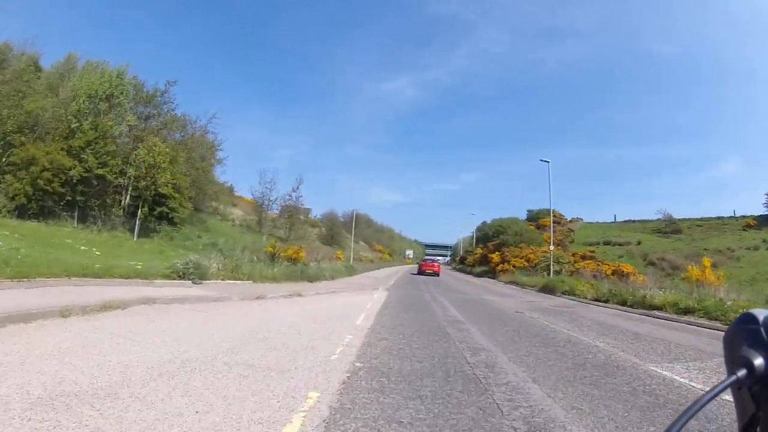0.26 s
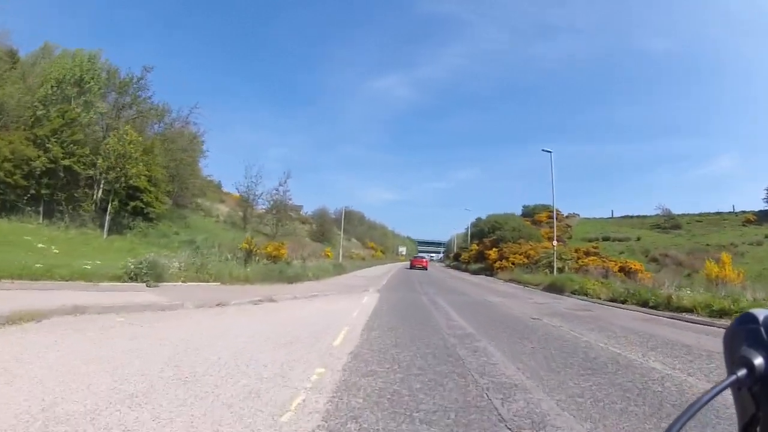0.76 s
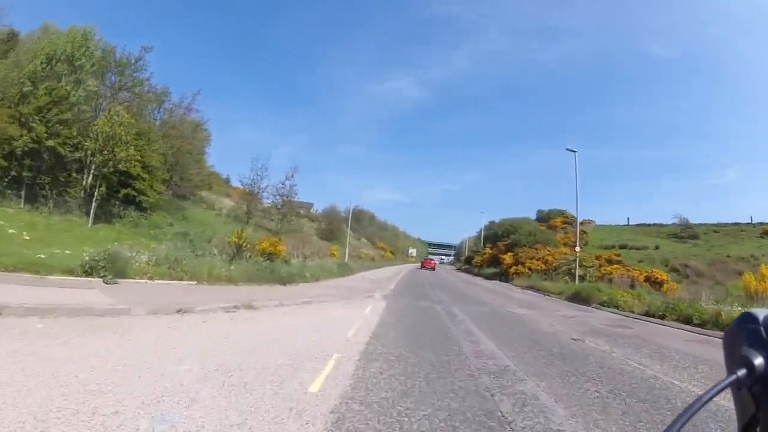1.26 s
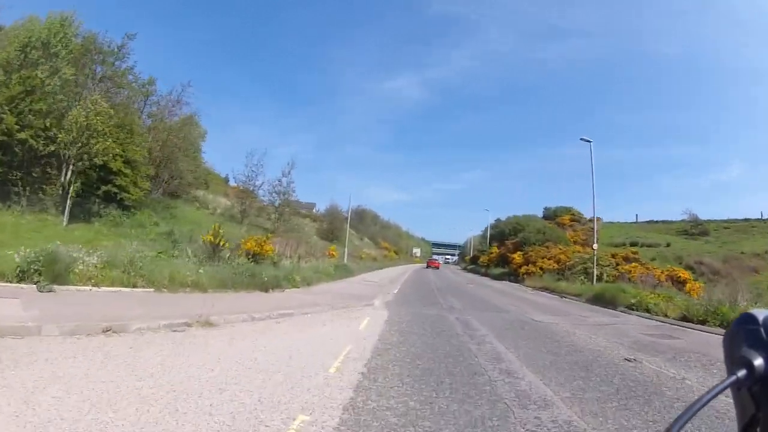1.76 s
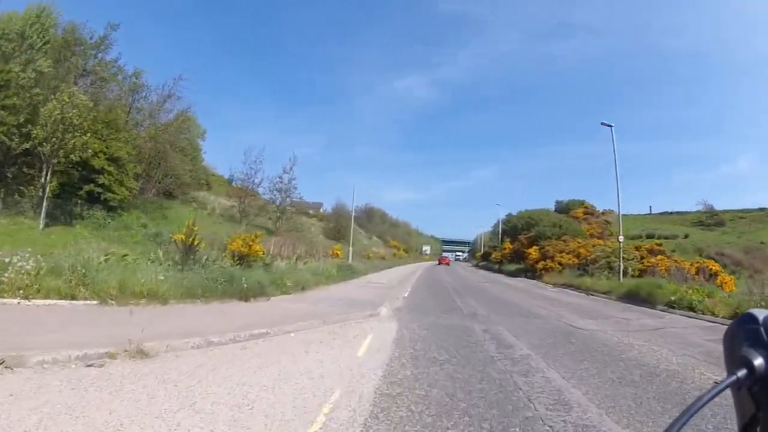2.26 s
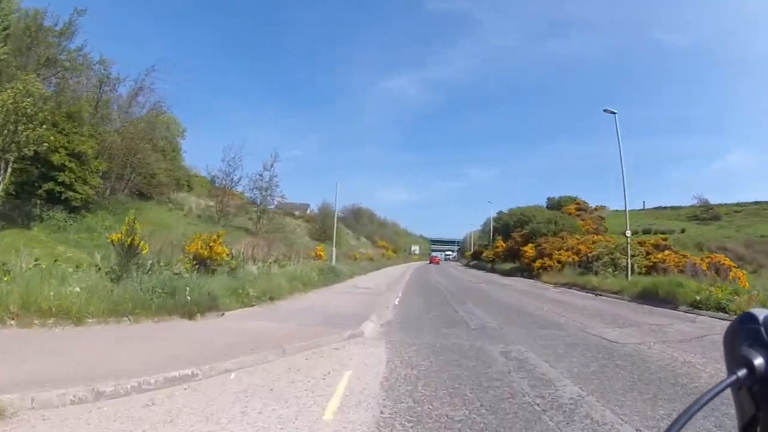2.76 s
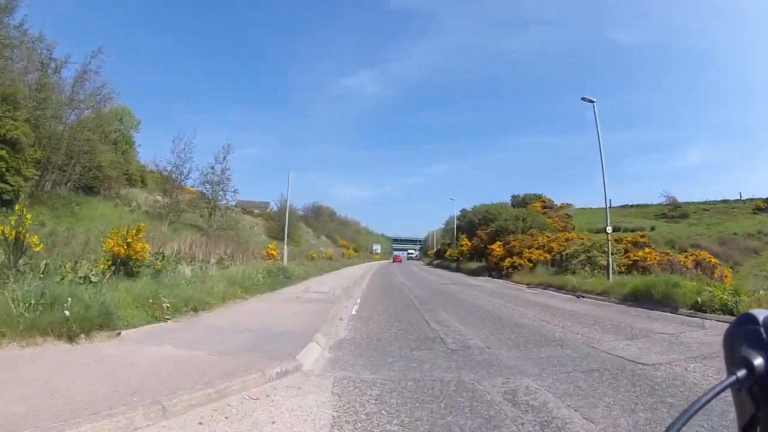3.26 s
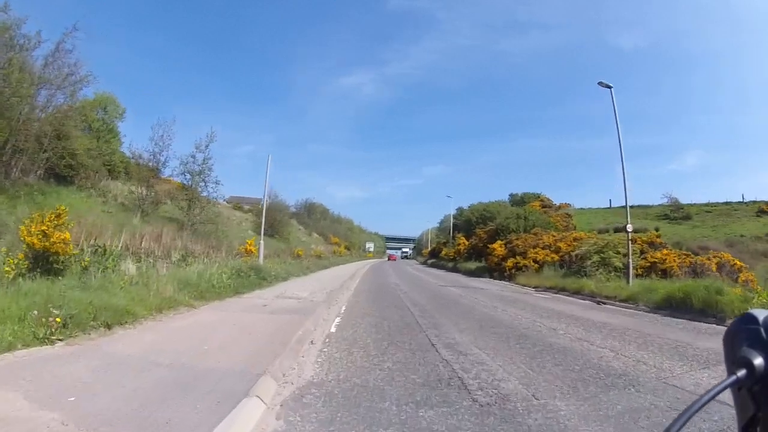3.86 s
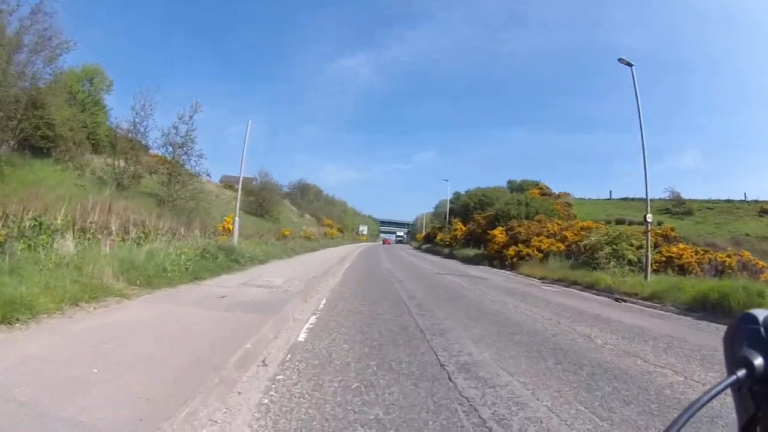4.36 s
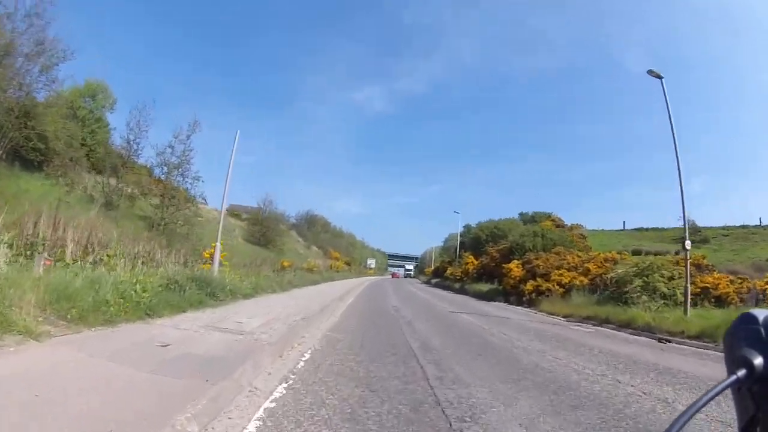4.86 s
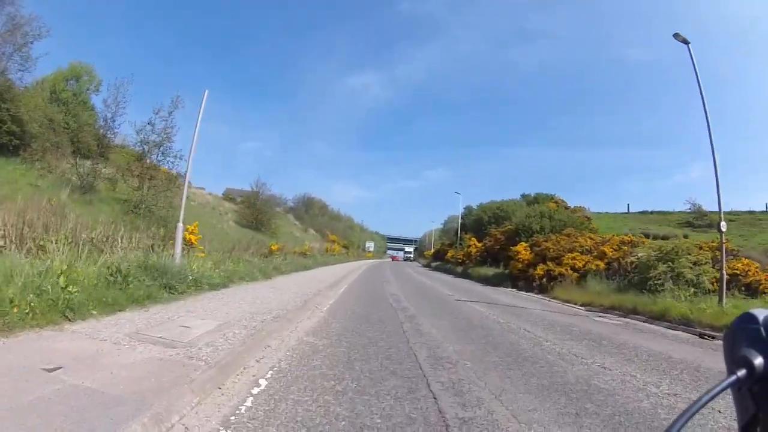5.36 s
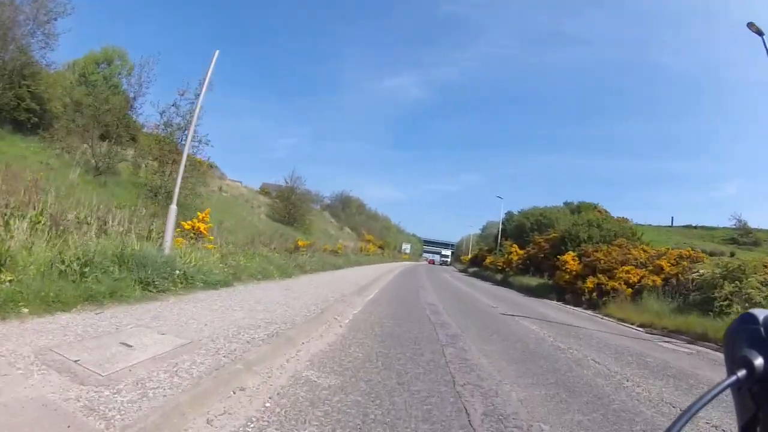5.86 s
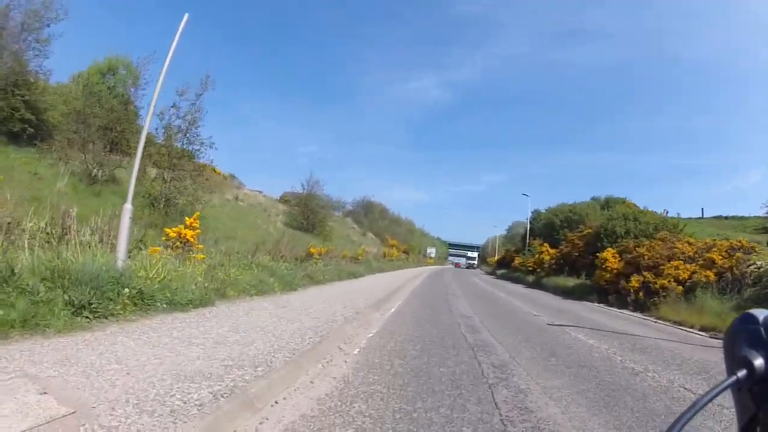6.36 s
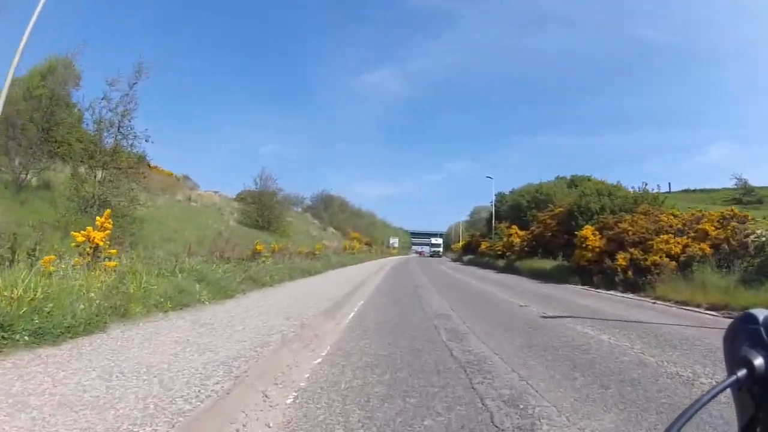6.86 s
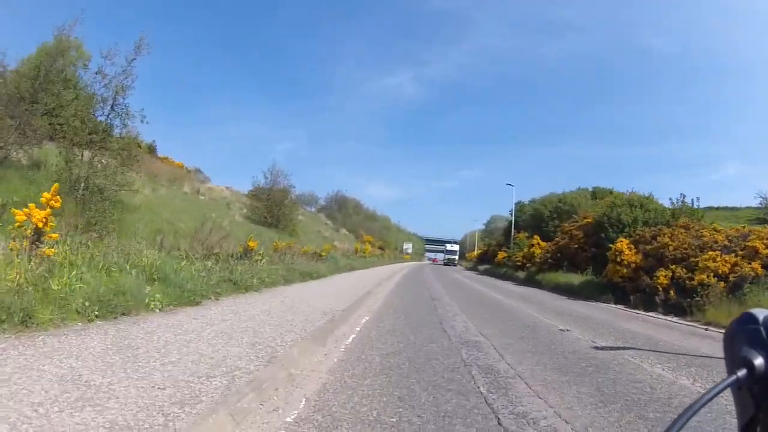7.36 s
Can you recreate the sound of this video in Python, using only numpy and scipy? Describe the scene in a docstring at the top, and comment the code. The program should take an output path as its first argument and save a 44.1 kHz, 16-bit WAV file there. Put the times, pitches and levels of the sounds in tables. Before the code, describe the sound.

Heard from the handlebar, tyres hum over rough tarmac, cables tick and slap, a passing car fades, and two bright metallic rattles burst out midway.

```python
"""Tyres hum on tarmac under ticking cables as a bicycle rolls along, heard from its handlebar; a car draws away.
Grit scrubs, a thin whistle comes and goes, the brake squeaks and loose metal clatters in sharp bursts.
Road roughness drives coloured noise (tyres) and resonances (frame, handlebar, cables); metal, stones and
slaps are short pushes rung through resonances. The car and the air are coloured noise; a late swish slides down."""
import sys
import numpy as np
from scipy import signal
from scipy.fft import rfft, irfft, next_fast_len
from scipy.io import wavfile
from scipy.ndimage import uniform_filter1d, map_coordinates

SR = 44100
rng = np.random.default_rng(int(sys.argv[2]) if len(sys.argv) > 2 else 0)


def store_pcm(level_fs):
    """Save levels as 16-bit WAV."""
    pcm = np.round(np.clip(level_fs, -1, 1) * 32767).astype(np.int16)
    wavfile.write(sys.argv[1], SR, np.atleast_2d(pcm).T)


N = 335601

# Roughness of the road under the wheels: [time_s, roughness_db]
ROAD_ROUGHNESS = [(0.0, -59.5), (1.5, -63), (1.61, -62), (1.7, -63.5), (1.84, -61), (2.33, -65.5),
                  (3.26, -65.5), (3.37, -59), (3.41, -64), (4.34, -67.5), (4.41, -60.5), (4.43, -60.5),
                  (4.87, -55.5), (5.0, -58), (6.17, -63), (6.57, -66), (6.93, -62.5), (7.61, -63)]
# Jolts that swing the handlebar and slap the cables: [start_s, level_db, hard_bright_share_0_to_1]
JOLTS = [(.12, -49, 0.06), (.353, -50, 0), (.405, -50, 0.05), (1.006, -54, 0), (1.081, -57, 0),
         (1.265, -51.5, 0), (1.316, -50, 0.03), (1.341, -49.5, .02), (1.57, -59, 0.6), (1.769, -49, 0),
         (1.852, -50, 0), (1.924, -45.5, 0), (2.005, -50.5, 0), (2.46, -48.5, 0), (2.545, -53.5, 0),
         (2.575, -47, 0), (2.831, -46, 0.02), (3.285, -42.5, 0), (3.348, -46, 0), (3.4, -45, 0),
         (3.465, -49.5, 0), (3.68, -48.5, .08), (3.955, -49.5, .05), (4.336, -45, 0.04),
         (5.179, -48.5, .04), (5.411, -43.5, 0.1), (5.594, -46, .15), (5.689, -45.5, 0.2),
         (5.731, -40, 0.1), (5.763, -45, 0.3), (5.791, -42.5, 0.1), (5.905, -46, 0), (5.944, -50.5, 0.15),
         (6.205, -51.5, 0.13), (6.415, -52, 0.1), (6.708, -47, .04), (7.051, -48.5, 0.03),
         (7.282, -52, 0.23), (7.472, -44.5, 0.04)]
# Hiss of the air, before its trim: [time_s, level_db]
AIR_LEVEL = [(0.0, -77), (1.02, -78), (4.37, -77.5), (4.58, -72), (4.92, -72), (5.64, -72), (6.53, -79),
             (7.16, -75), (7.61, -79)]
# The tyres scrub over loose grit: [start_s, length_s, level_db]
SCRUBS = [(.06, .3, -54), (1.5, 0.24, -54.5), (1.723, 0.41, -55), (2.426, 0.6, -57.5), (3.27, 0.31, -62),
          (5.048, 0.32, -57), (5.64, 0.27, -59.5), (6.89, .2, -66)]
# A thin whistle comes and goes: [start_s, length_s, level_db]
WHISTLES = [(0.095, .22, -53), (6.26, 0.63, -64.5), (7.373, .1, -58)]
# The tyre meets a seam or stone, before the trim: [start_s, level_db, sharp_snap_share_0_to_1]
KNOCKS = [(3.326, -46, 0.5), (3.372, -39.5, 0), (3.381, -51, 0.1), (4.732, -45, 0.8), (4.8829, -37, 0.5),
          (6.053, -48.5, 0.7), (6.9075, -41, 0.86), (6.917, -53, 0.5)]
# Short squeaks as the brake rubs, before the trim: [start_s, length_s, pitch_hz, level_db]
SQUEAKS = [(3.387, 0.011, 5500, -53), (3.585, 0.017, 5480, -55), (4.324, 0.013, 5520, -50),
           (4.365, 0.032, 6230, -69)]
# Loose metal strikes, before the trim:
# [start_s, level_db, hard_bright_share_0_to_1, first_flight_s, loss_per_rebound_db]
METAL_STRIKES = [(4.399, -24, .2, 0.0016, 16), (4.4044, -11, 0.09, 0.0044, 2.5),
                 (4.4367, -25, 0.8, 0.0053, 9), (4.4598, -28, 0.4, 0.0044, 6),
                 (4.4698, -18, 0.48, .0034, 6.5), (4.758, -13, 1, 0.0041, 2.5),
                 (4.7773, -22.5, 0.14, .0045, 1.2), (4.8112, -15.5, 1, 0.0037, 14),
                 (4.8255, -17.5, .06, .0027, 15), (4.8354, -20, 0.15, .0025, 5),
                 (4.8922, -24.5, 0.65, 0.0083, 11), (4.9171, -14, 0, .0022, 12),
                 (4.9253, -17, 0.26, 0.0028, 21), (4.929, -13.5, 0.08, .0053, 12),
                 (4.949, -25, 0.25, .008, 7.5), (4.9707, -25, 0.05, 0.0022, 5),
                 (4.986, -32, .02, .006, 4.5), (5.014, -31, 0, 0.0036, 5.5),
                 (5.245, -33.5, 0.07, 0.0025, 1.5), (5.292, -36, 0.15, 0.0025, 5)]
# The metal parts stay in touch and chatter, before the trim: [start_s, end_s, level_db]
CHATTER_RUNS = [(4.393, 4.401, -37), (4.428, 4.487, -37.5), (4.756, 4.794, -34), (4.833, 4.855, -37),
                (4.889, 4.904, -43), (4.912, 4.953, -36.5), (4.968, 4.974, -36), (5.242, 5.254, -40.5)]
# A faint swish slides down, before its trim: [time_s, centre_hz, level_db]
SWISH_PATH = [(6.15, 5990, -90), (6.19, 5310, -61), (6.21, 4600, -58), (6.25, 3500, -58), (6.3, 2880, -61),
              (6.34, 2500, -80)]

# Resonances of each body, levels relative within the set: [centre_hz, width_hz, level_db]
FRAME_MODES = [(188.6, 31, -13), (274.8, 20.3, -0.5), (313, 29.4, 0.5)]
HANDLEBAR_MODES = [(73.3, 7.9, 0)]
CABLE_DULL_MODES = [(2410, 230, -5.5), (3110, 200, -2), (3480, 53, 1), (4767, 266, 1), (6480, 150, -10),
                    (7310, 250, -14)]
CABLE_HARD_MODES = [(4770, 610, 2), (8930, 260, 3), (12060, 300, 0.5), (12700, 400, -5)]
THUD_MODES = [(280, 104, 16), (685, 190, 6.4), (1350, 510, 10)]
SNAP_MODES = [(1740, 200, -3), (3490, 910, -19)]
METAL_DULL_MODES = [(1640, 390, 1), (3570, 260, 9.5), (4350, 130, -4), (4660, 1100, 2), (5150, 81, 7),
                    (6340, 570, -2.5), (7630, 780, 2), (8000, 210, -1), (8800, 610, -5), (10200, 1400, -9),
                    (13000, 900, -26)]
METAL_HARD_MODES = [(2600, 380, -6.5), (4900, 930, -8.5), (6140, 210, -2), (7960, 410, -2.5),
                    (9410, 420, 1), (12040, 990, -7), (13060, 730, -3.5), (15600, 660, -11)]

# Noise colours, relative levels: [frequency_hz, level_db_per_hz]
TYRE_COLOUR = [(30, -32), (130, -12), (200, 0.5), (420, -2), (500, 2.5), (570, 0), (650, 3), (770, -1),
               (1050, 2), (1300, -1.5), (2400, -5), (3200, -7.5), (5500, -16), (14000, -26.5)]
CAR_COLOUR = [(200, -24), (600, -17), (820, -18), (960, -2), (1090, 4), (1280, -6.5), (1480, -2),
              (2000, -6), (2600, -14), (3800, -25.5), (7000, -40.5), (14000, -55)]
AIR_COLOUR = [(500, -13), (4000, -4), (7500, -3), (10000, -5), (15500, -3.5)]
GRIT_COLOUR = [(700, -20), (1100, 1), (1600, 4.5), (2400, 2), (3400, -10.5), (5500, -23), (14000, -28.5)]

T = np.arange(N) / SR  # time in seconds
TOP_HZ = 15900  # band limit of the microphone signal

# Level on the usual road, and dB gained per dB of extra roughness
USUAL_ROAD_DB = -62
ROAR_DB, ROAR_GROWS = -57, 0.97
HUM_DB, HUM_GROWS = -60.5, 0.46
SHAKE_DB, SHAKE_GROWS = -73.5, 0.28
BUZZ_DB, BUZZ_GROWS = -61.5, 0.28

# A bumpy stretch adds most to the shake and the hum at its middle
PATCH_S, PATCH_LENGTH_S, PATCH_SHAKE_DB, PATCH_HUM_DB = 3.99, 2.4, 5.5, 2.5

SWING_HZ, SECOND_TAP_DB = 69.9, -6.5  # a cable slaps again one swing later, softer
SHAKE_JOLT_DB, BUZZ_JOLT_DB = -40, -40.5  # the jolt that doubles the shake, and the buzz
JOLT_LEAD_S, JOLT_S = 0.037, 0.13  # the bar starts to swing just before the slap; how long it swings

CAR_DB, CAR_START_M, CAR_AWAY_M_PER_S = -48.5, 29, 6.74  # first level and distance, speed of drawing away
GROUND_LOSS_DB_PER_M = 0.2553
SURGE_S, SURGE_LENGTH_S, SURGE_DB = 0.13, 0.46, 2  # the car's roar surges once while it is still near

FLIGHT_SHRINK = 0.76  # each rebound's flight over the one before


def amp(db):
    """Decibels to gain."""
    return 10 ** (np.asarray(db) / 20)


def unit(x):
    """Scale to rms 1."""
    return x / np.sqrt(np.mean(x ** 2) + 1e-20)


def curves(rows):
    """One value per sample for each column after the time."""
    s, *cols = np.transpose(rows)
    return [np.interp(T, s, c) for c in cols]


def wobble(rate):
    """A smooth random curve, rate knots a second."""
    knots = rng.standard_normal(int(N * rate / SR) + 4)
    return map_coordinates(knots, [T * rate])


def swell(s, length):
    """A rounded rise and fall."""
    return np.sin(np.pi * np.clip((T - s) / length, 0, 1))


def filtered(x, response):
    """x shaped by a complex response of frequency."""
    size = next_fast_len(len(x) + 4096)
    hz = np.fft.rfftfreq(size, 1 / SR)
    return irfft(rfft(x, size) * response(hz), size)[:len(x)]


def ring(x, modes):
    """x played through parallel resonances of alternating sign."""
    def response(f):
        total = 0
        for k, (centre, width, db) in enumerate(modes):
            damping = 1j * f * width
            total = total + (-1) ** k * amp(db) * damping / (centre * centre - f * f + damping)
        return total
    return filtered(x, response)


def low_cut(x, edge_hz):
    """Small parts radiate no bass."""
    return signal.sosfilt(signal.butter(2, edge_hz, "highpass", fs=SR, output="sos"), x)


def rush(spectrum, patchy_db=0):
    """Noise of rms 1 with the given colour, in drifting patches of random gain."""
    z = signal.stft(rng.standard_normal(N), nperseg=1024)[2]
    field = uniform_filter1d(rng.standard_normal(z.shape), size=4, axis=0)  # smooth over frequency
    field = uniform_filter1d(field, size=12, axis=1)  # then over time
    noise = signal.istft(z * amp(patchy_db * unit(field)), nperseg=1024)[1][:N]
    hz, db = np.transpose(spectrum)
    return unit(filtered(noise, lambda f: amp(np.interp(np.log(f + 1), np.log(hz), db))))


def narrow_noise(centre_hz, width_hz):
    """A fuzzy tone of rms 1."""
    phase = 2 * np.pi * np.cumsum(centre_hz * np.ones(N)) / SR
    return unit(wobble(width_hz) * np.cos(phase) + wobble(width_hz) * np.sin(phase))


def strikes(rows, dull, hard, t60, scatter, tail_db, tail_t60, vary_db=1, size=4096):
    """Each blow is a push plus dying scatter, rung through two bodies; its level is its energy over 1 ms."""
    out, t = np.zeros(N + size), np.arange(size) / SR
    decay = amp(-60 * t / t60) + amp(tail_db - 60 * t / tail_t60)
    for s, db, share in rows:
        force = scatter * rng.standard_normal(size) * decay
        force[0] += 1
        share = np.clip(share, 0, 1)

        def body(modes):
            # no two blows land on the same spot
            varied = [(hz, width, level + vary_db * rng.standard_normal()) for hz, width, level in modes]
            return unit(ring(force, varied))

        blow = np.sqrt(1 - share) * body(dull) + np.sqrt(share) * body(hard)
        out[round(s * SR):][:size] += amp(db) * unit(blow) * np.sqrt(SR / 1000 / size)
    return out[:N]


def driven(db, grows):
    """Gain of a sound that grows with the roughness of the road."""
    return amp(db + grows * (curves(ROAD_ROUGHNESS)[0] - USUAL_ROAD_DB))


def swing(doubling_db):
    """The handlebar swings wider at each jolt; 1 when it is calm."""
    power = sum(amp(db - doubling_db) * swell(s - JOLT_LEAD_S, JOLT_S) ** 2 for s, db, share in JOLTS)
    return 1 + np.sqrt(power)


def rolling():
    """Road grain drives the tyre roar, the hum of the frame and the throbbing shake of the handlebar."""
    grain = amp(0.43 * wobble(30))  # rougher and smoother patches pass under the wheels
    bumpy = swell(PATCH_S, PATCH_LENGTH_S)
    roar = driven(ROAR_DB, ROAR_GROWS) * rush(TYRE_COLOUR, patchy_db=1.63)
    frame = unit(ring(rng.standard_normal(N), FRAME_MODES))
    hum = driven(HUM_DB + PATCH_HUM_DB * bumpy, HUM_GROWS) * frame
    shake = unit(ring(rng.standard_normal(N), HANDLEBAR_MODES))
    shake = unit(shake / (np.abs(signal.hilbert(shake)) + 3.1))  # wide swings are damped the most
    shake_gain = driven(SHAKE_DB + PATCH_SHAKE_DB * bumpy, SHAKE_GROWS) * swing(SHAKE_JOLT_DB)
    return grain * (roar + hum) + shake_gain * shake


def cables(spread_db=6.0, jitter_s=0.002, hard_db=-4):
    """Cables tap once in each swing of the bar and slap twice at each jolt; hard slaps brighten the taps."""
    s = np.arange(0, N / SR, 1 / SWING_HZ)
    chance = rng.standard_normal((len(s), 2))
    at = np.clip((s + jitter_s * chance[:, 0]) * SR, 0, N - 1).astype(int)
    strength = driven(BUZZ_DB, BUZZ_GROWS) * swing(BUZZ_JOLT_DB)
    tap_gain = strength[at] * amp(spread_db * np.minimum(chance[:, 1], 1))
    taps = np.bincount(at, tap_gain, N)
    hardness = sum(share * swell(start - JOLT_LEAD_S, JOLT_S) for start, db, share in JOLTS)
    hardness = np.sqrt(np.abs(hardness))
    dull = unit(ring(rng.standard_normal(N), CABLE_DULL_MODES))
    hard = unit(ring(rng.standard_normal(N), CABLE_HARD_MODES))
    t = np.arange(SR // 20) / SR
    tap_envelope = signal.fftconvolve(taps, amp(-60 * t / 0.021))[:N]  # falls 60 dB in 21 ms
    buzz = tap_envelope * (dull + amp(hard_db) * hardness * hard)
    slaps = [(start + k / SWING_HZ, db + k * SECOND_TAP_DB, share)
             for start, db, share in JOLTS for k in range(2)]
    ticks = strikes(slaps, CABLE_DULL_MODES, CABLE_HARD_MODES,
                    t60=0.011, scatter=0.29, tail_db=-14, tail_t60=0.027)
    return low_cut(buzz + amp(3.0) * ticks, 1100)


def car():
    """The tyre roar of the car fades with distance and loss along the road as it draws away."""
    gained_m = CAR_AWAY_M_PER_S * T
    spreading = CAR_START_M / (CAR_START_M + gained_m)
    level_db = CAR_DB - GROUND_LOSS_DB_PER_M * gained_m + SURGE_DB * swell(SURGE_S, SURGE_LENGTH_S)
    return spreading * amp(level_db + 0.26 * wobble(13)) * rush(CAR_COLOUR, patchy_db=2.4)


def air():
    """A smooth hiss of air over the microphone."""
    return amp(curves(AIR_LEVEL)[0] + 7) * rush(AIR_COLOUR)


def grit():
    """A grainy scrub rises and falls as the tyres cross each gritty stretch."""
    level = sum(amp(db) * swell(s, length) for s, length, db in SCRUBS)
    return level * unit(amp(4.4 * wobble(150)) * rush(GRIT_COLOUR, patchy_db=3.0))


def whistle():
    """A thin, broken whistle on one pitch: a fuzzy tone with a fluttering level."""
    flutter = amp(7.9 * np.minimum(wobble(70), 0.5))
    tone = unit(flutter * narrow_noise(centre_hz=2470, width_hz=430))
    return sum(amp(db) * swell(s, length) for s, length, db in WHISTLES) * tone


def bumps():
    """Seams thud through the tyre; small stones snap out from under it."""
    knocks = strikes(KNOCKS, THUD_MODES, SNAP_MODES, t60=0.0046, scatter=0.15, tail_db=2, tail_t60=0.036)
    return amp(3.5) * knocks


def brake(waver=0.006):
    """The brake brushes the wheel and sings for an instant, a sine of wavering pitch."""
    out = np.zeros(N)
    for s, length, hz, db in SQUEAKS:
        pitch_hz = hz * (1 + waver * wobble(200))
        out += amp(db + 0.5) * swell(s, length) * np.sin(2 * np.pi * np.cumsum(pitch_hz) / SR)
    return out


def rebounds(count=5):
    """Each strike of the metal comes back ever sooner and softer."""
    return [(s + flight * np.sum(FLIGHT_SHRINK ** np.arange(k)), db - k * loss_db, share)
            for s, db, share, flight, loss_db in METAL_STRIKES for k in range(count)]


def clatter(bounces_per_s=1300, spread_db=3):
    """Loose metal strikes and rebounds; in chatter, random tiny bounces ring the dull body."""
    contacts = strikes(rebounds(), METAL_DULL_MODES, METAL_HARD_MODES,
                       t60=0.006, scatter=0.22, tail_db=-24, tail_t60=0.04)
    hits = rng.random(N) < bounces_per_s / SR
    bounces = hits * amp(spread_db * rng.standard_normal(N)) * rng.choice([-1, 1], N)
    runs = sum(amp(db) * ((T > start) & (T < end)) for start, end, db in CHATTER_RUNS)
    runs = uniform_filter1d(runs, size=130)  # 3 ms ramps
    chatter = runs * unit(ring(bounces, METAL_DULL_MODES))
    return low_cut(amp(-4.0) * contacts + amp(-1.5) * chatter, 1100)


def swish():
    """A rough band of hiss slides down."""
    centre_hz, db = curves(SWISH_PATH)
    level = amp(db - 5.0 + 2.4 * wobble(120))
    sounding = (T > SWISH_PATH[0][0]) * (T < SWISH_PATH[-1][0])
    return level * narrow_noise(centre_hz, width_hz=1200) * sounding


def scene():
    """Everything reaches the one microphone directly, in open air."""
    bicycle = rolling() + cables() + grit() + bumps() + brake() + clatter()
    return (bicycle + car() + air() + whistle() + swish())[None]


def record(dry):
    """A very steep roll-off leaves next to nothing above the band limit."""
    return filtered(dry[0], lambda hz: 1 / np.sqrt(1 + (hz / TOP_HZ) ** 160))[None]


dry = scene()
out = record(dry)
store_pcm(out)
```